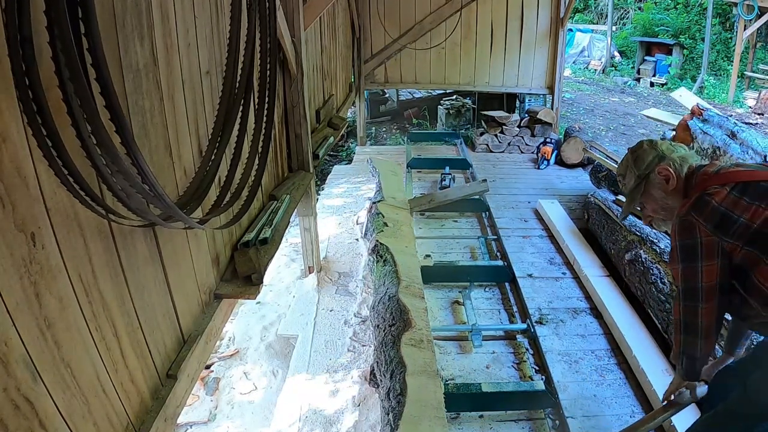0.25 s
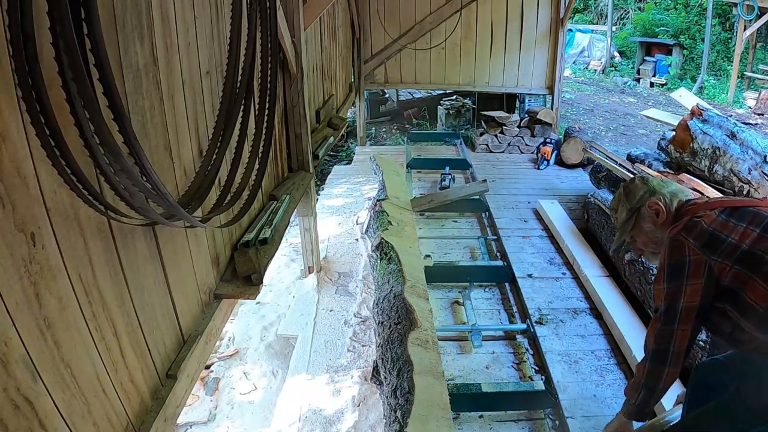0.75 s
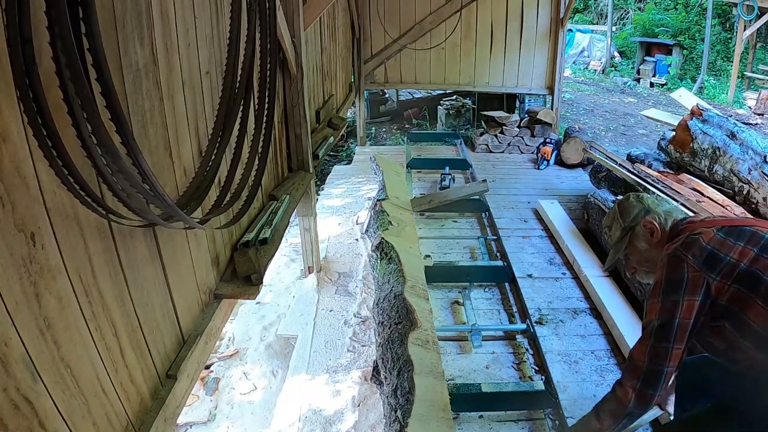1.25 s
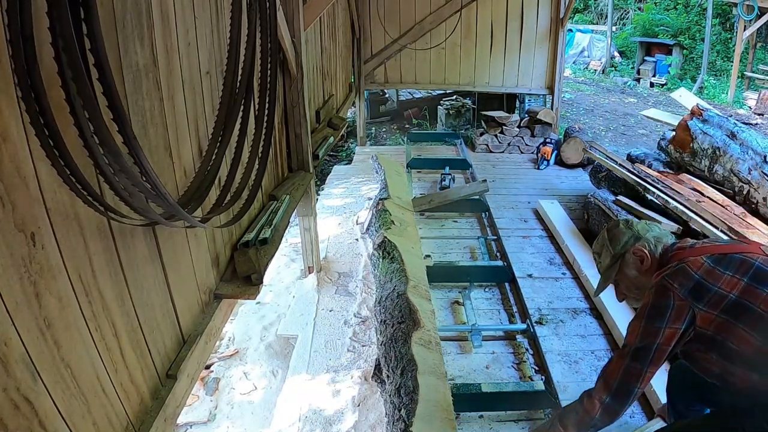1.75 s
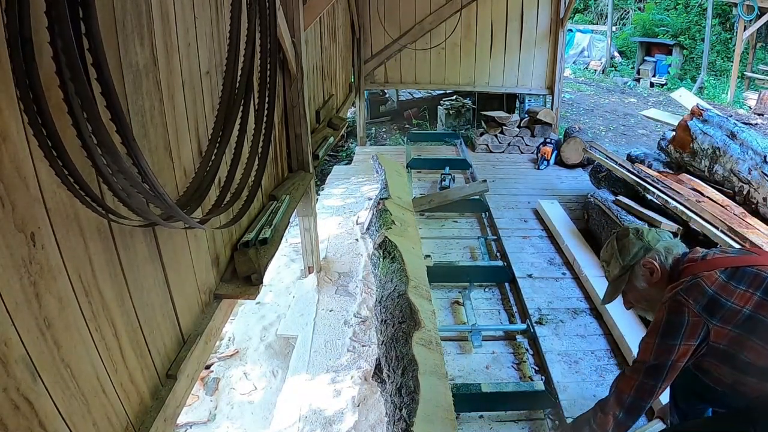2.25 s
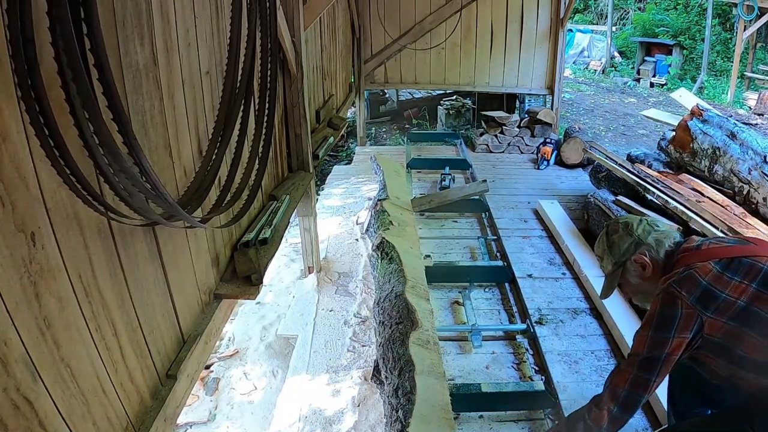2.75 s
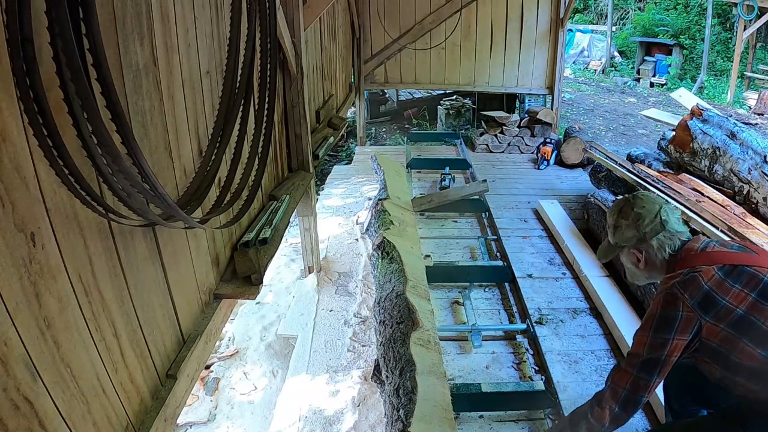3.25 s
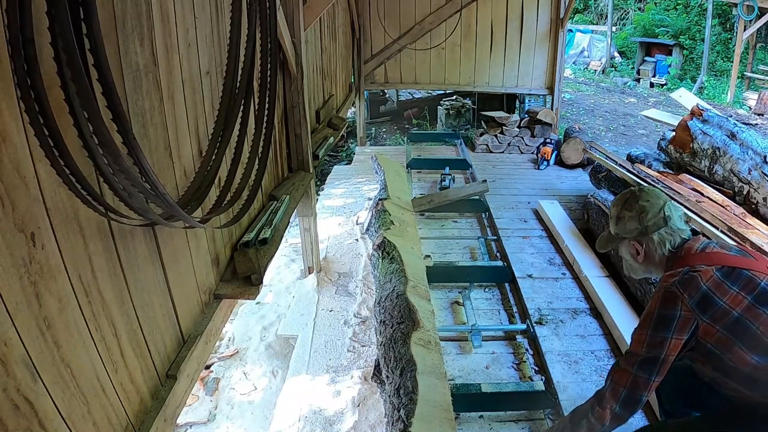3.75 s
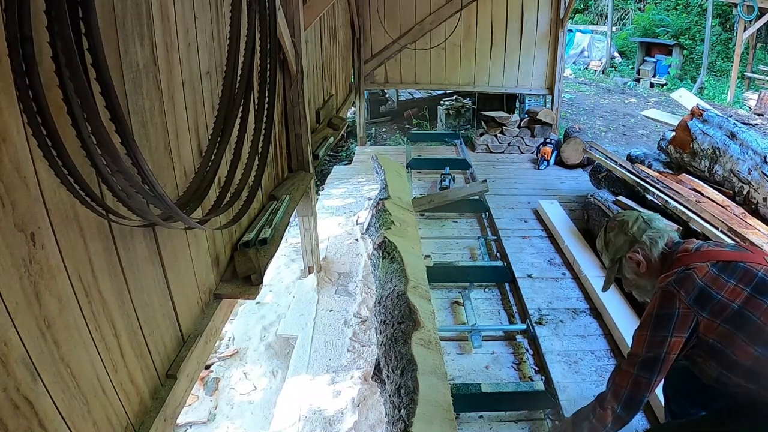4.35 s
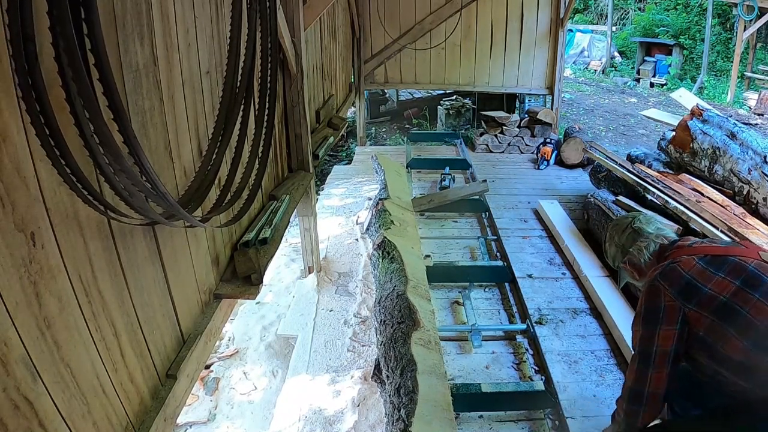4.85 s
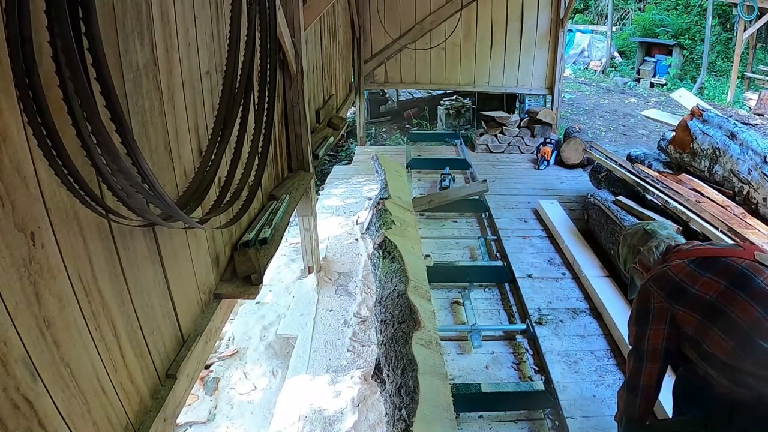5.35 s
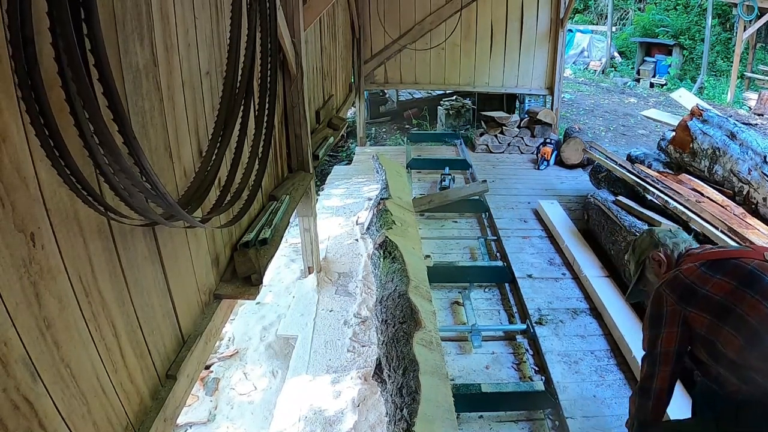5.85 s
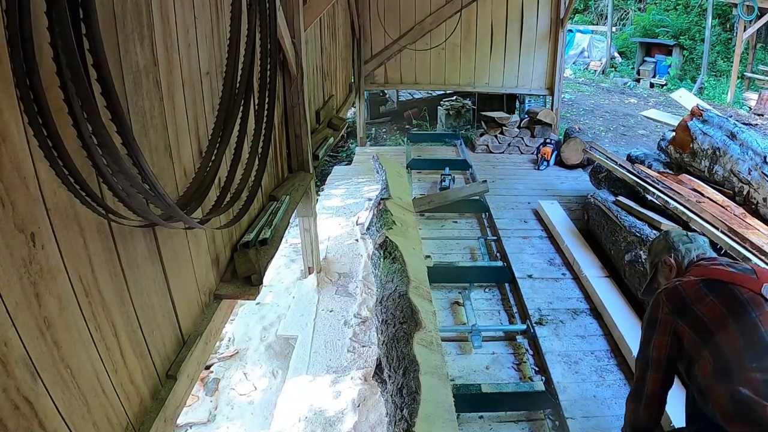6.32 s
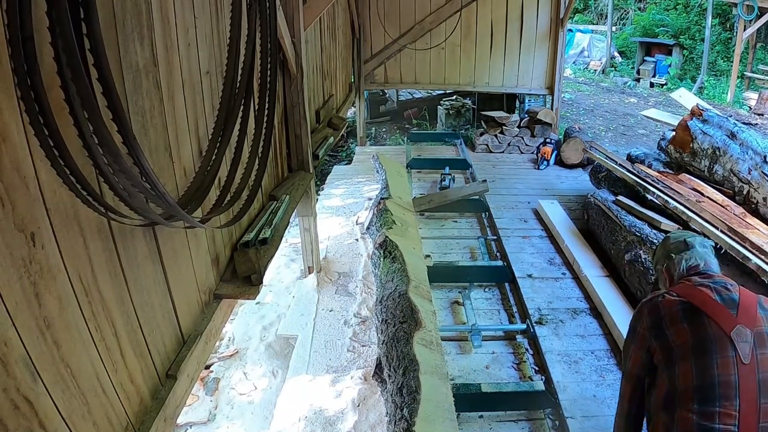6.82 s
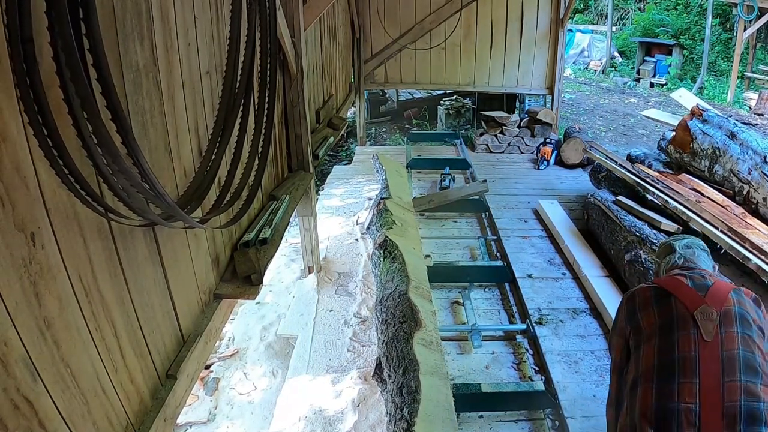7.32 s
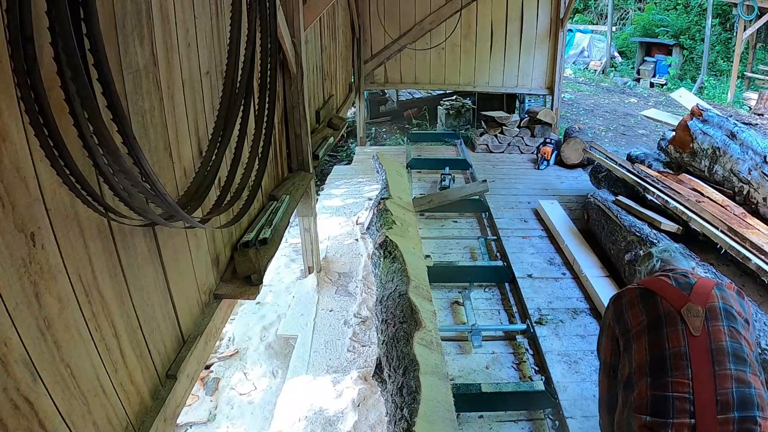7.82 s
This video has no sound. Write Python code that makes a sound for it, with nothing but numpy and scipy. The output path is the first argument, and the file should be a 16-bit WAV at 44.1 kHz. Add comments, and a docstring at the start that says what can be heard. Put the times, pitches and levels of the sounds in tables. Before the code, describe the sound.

A nearby stereo microphone in an open plank shed hears a heavy slab being worked on steel. Light taps and soft boot thuds begin; at 0.5 s a hard woody clunk with a scrape, at 1.0 s the loudest blow, steel ringing briefly and the floor booming low. A loose bar makes a tiny quick rattle at 1.65 s, then a medium knock at 2.0 s. Work quiets from 2 to 5.5 s, leaving a low vehicle hum and rumble with upper tones swelling around 2.5-3 s and fading, over smooth faint road wash, and soft thuds near 4.1 s. At 5.65-5.85 s come a knock, short scrape and deep thumps; crisp knocks at 6.24 and 6.36 s; faint rubbing and footfalls to 7 s. From 7.5 s hollow, lower knocks, a big floor thud and gritty stuttering drags continue to the end at 8 s.

```python
"""A wooden slab is levered with a bar, knocked and dragged on a steel sawmill bed in an open shed.
Blows and scrapes push the plank floor, slab and steel, which ring; boots thud as soft pushes.
A loose bar bounces on a rail: small clicks and slips ring its own tones.
Behind this a vehicle drones past on a road, as a low hum and upper tones that swell and fade,
over its rumble and a smooth noise wash of tyres and trees."""
import sys
import numpy as np
from scipy import signal
from scipy.fft import rfft, irfft
from scipy.io import wavfile
from scipy.ndimage import uniform_filter1d

SR = 44100
rng = np.random.default_rng(int(sys.argv[2]) if len(sys.argv) > 2 else 0)


def dump(signal):
    """Clip the signal to [-1, 1] and save it as 16-bit WAV at the path in sys.argv[1]."""
    limited = np.clip(np.atleast_2d(signal).T, -1, 1)
    pcm = np.round(limited * 32767).astype(np.int16)
    wavfile.write(sys.argv[1], SR, pcm)


N = 356328

# Hard blows. Each row: start in seconds, build-up of the contact in seconds, knock level in dB, then
# levels in dB against the knock: slab bending, slab knock tones, steel ringing, crack, snap, treble tick.
KNOCK_EVENTS = [(0.0924, 0.0037, -23, -5, -3, -3.5, -8.5, -11, -18),
                (0.245, 0.00047, -35, -5, -8, -6, -3, -7, 7.5),
                (0.445, 0.0047, -25.5, -6, 4.5, 5, -21, -16, -30),
                (0.5263, 0.0015, -8.5, 6, 1, -3, -5, -13, -35),
                (0.971, 0.0018, -25, 13.5, -9, 7, -9, -9, -33),
                (1.0204, 0.0014, -4.5, 2, -9, 0, -11, -20, -39.5),
                (1.029, 0.0011, -21.5, 7, -3, -11, 5, -14, -35),
                (1.9854, 0.0014, -20.5, -10, -7, -0.5, -12, -15, -20.5),
                (2.9944, 0.0019, -47, 0, -1, 1, 1, 3.5, -4.5),
                (4.589, .001, -46.5, 16, 11, -6, -5, -17, -28),
                (5.216, 0.00093, -53, 10, 16, -4, -2, 1, 3.5),
                (5.259, 0.00089, -55, -7, 10, -4, -3, -10, 0),
                (5.6405, .003, -31.5, -7, -1, 0, -12, -16, -31),
                (5.664, 0.0013, -17, -22, -2.5, -9, -13, -18, -17),
                (5.929, .0004, -38, 10, -14, -17, -1.5, -3.5, -1),
                (6.2388, 0.0019, -13.5, 0, -3.5, -6, -5.5, -10.5, -15),
                (6.3623, 0.00037, -14, 0, -2, -3.5, -7.5, -9.5, -16),
                (7.5176, 0.0036, -23.5, -15, 5.5, 4.5, -14, -18, -30),
                (7.5725, 0.0017, -20, -3, 9.5, 9, -10, -25, -27),
                (7.7336, 0.0021, -17.5, -7, 3, 2.5, -4.5, -13, -27),
                (7.8532, 0.0036, -24.5, 11, -15, -5, 2, -2, -14)]
# Boots and the slab's weight on the planks. Each row: start in seconds, floor level in dB,
# slab bending in dB against the floor.
THUD_EVENTS = [(0.031, -16, -5.5), (0.116, -16, -11), (0.241, -16.5, -2.5), (0.33, -13.5, -11),
               (0.45, -8, -21), (0.49, -7.5, -1), (0.517, -5, 2.5), (0.557, 3.5, -29), (0.599, -9, -8),
               (0.724, -9, -10.5), (0.917, -9.5, -12), (0.974, -7, -15), (1.021, -3, -14), (1.077, 2.5, -8),
               (1.193, -13, -7), (2.759, -15.5, -6), (3.42, -24, -5), (3.601, -27, 0), (3.955, -24, 2),
               (4.106, -10.5, 0.5), (4.128, -8.5, 0), (4.156, -8.5, -8.5), (4.2, -20, 1),
               (5.477, -9.5, -10.5), (5.529, -19.5, -1), (5.676, -1, -31), (5.724, 0.5, -23),
               (5.769, 3, -10.5), (5.835, 1, -34), (6.1, -6.5, -4), (6.126, -5, -13), (6.154, -38, 24),
               (6.233, -11.5, -9), (6.361, -9, -4.5), (6.416, -10.5, -0.5), (6.506, -14, -36),
               (6.781, -11, -26), (6.842, -20, -17), (6.99, -20, -24), (7.034, -30, -25), (7.569, 0, -13),
               (7.641, -3, -23), (7.694, -22.5, 9), (7.725, -5.5, -4), (7.795, -7, -28), (7.85, -10, -7.5),
               (7.968, -11.5, -21)]
# One list per drag. Each row: time in seconds, rub level in dB, then levels in dB against the rub:
# shaking of the slab, steel ringing, treble hiss.
DRAG_CURVES = [
    [(0.38, -53, 30, 0, -22), (0.428, -54.5, 18.5, 2, -14), (0.456, -28, 7, -3, -19.5),
     (0.486, -31.5, 15, 0, -17), (0.514, -25, 2, 3, -23), (0.536, -13.5, 4.5, -3, -20.5),
     (0.618, -39, 18, 5.5, -27), (0.754, -53, 18.5, -1, -18), (0.8, -51, 28, 5, -19)],
    [(0.82, -29, 24, 2, -15), (0.86, -49.5, 20.5, -23.5, -14.5), (0.948, -35, 10, 9, -18),
     (0.982, -18.5, 6, -5, -32), (1.008, -27, 23.5, -20, -29.5), (1.03, -17, -13, 12, -34),
     (1.058, -17.5, 1.5, -2, -41), (1.11, -33.5, 4.5, 2, -41), (1.206, -57.5, 26, 18.5, -52),
     (1.4, -67, 29, 1, -32)],
    [(5.6, -64, 28, 0, -8), (5.65, -49.5, 25, 3, -5), (5.696, -31.5, 3, 8, -14), (5.74, -20, 6, -19, -17),
     (5.77, -18.5, -1, -5, -15.5), (5.8, -26.5, 9, -7, -13.5), (5.825, -47, 3, -15, -4),
     (5.884, -77, 22, 0, -3), (5.92, -67, 21, -4, -4)],
    [(6.55, -53, -3, 2, -24), (6.608, -52, 14, -8, -8), (6.66, -44.5, 2, 2, -12), (6.77, -56, 7, 6, -2),
     (6.796, -54, -4, -15, -2.5), (6.85, -60, 0, 4, -1)],
    [(7.3, -52, 3, -2, -27), (7.444, -41, 9.5, 1, -19), (7.496, -38.5, 4, 9, -18),
     (7.538, -29.5, -9, -13, -15.5), (7.575, -28, 12, 13, -15), (7.605, -25, 3, 12, -18),
     (7.64, -24.5, 1, -3, -11), (7.665, -26, 10.5, -8, -18), (7.708, -29, 12.5, -3, -15),
     (7.746, -35.5, 21.5, -10, -11), (7.8, -26.5, -8, -8, -19), (7.84, -25, -0.5, -10, -13),
     (7.865, -23.5, -12, -7, -18), (7.89, -20.5, -18, -4, -13), (7.91, -18.5, -9, -20, -20.5),
     (7.93, -49.5, 10, 4, 9.5), (8.042, -40.5, -14, -5, -25), (8.08, -20, 3, 3, -1)],
]
# The bar bouncing on a rail. Each row: start in seconds, tap level in dB,
# level in dB of the slips that follow.
BAR_BOUNCES = [(1.627, -61, -61.5), (1.6444, -39, -63), (1.667, -54, -65.5), (1.681, -57, -68),
               (1.706, -48, -73)]

# Ringing tones of each body. Each row: pitch in Hz, level in dB against the body's other tones,
# time to die by 60 dB in seconds.
FLOOR_MODES = [(61.3, 26.5, 0.43), (65, 31.5, 0.22), (74, 15.5, 0.017), (100, -8.5, 0.04), (132, -1, 0.076)]
FIRST_FLOOR_MODES = [(68.2, 2.5, 0.31), (74.8, 0.5, 0.4), (89.1, 4.5, 0.31), (101.4, -4.5, 0.24),
                     (121, -21, 0.056)]  # higher, while the first end is levered
SLAB_MODES = [(150.7, -2.5, 0.06), (165, -9, 0.42), (208, -1.5, 0.28), (231.1, 5, 0.34), (241.45, -1, 0.37),
              (291, -8, 0.21)]
SLAB_KNOCK_MODES = [(384.5, -3.5, 0.25), (421, -4, 0.32), (450.5, -8.5, 0.35), (490.3, 3.5, 0.13),
                    (519.7, -1, 0.18), (590, -15, 0.13), (676, -15.5, 0.47)]
STEEL_MODES = [(840, -18.5, 0.081), (909, 0.5, 0.38), (944, 6.5, 0.25), (987, -3, 0.25), (1021, 11.5, 0.16),
               (1117, 4.5, 0.23), (1310, -13.5, 0.35), (1490, -4.5, 0.3), (1800, -17, 0.093),
               (1870, -1, 0.15), (2102, -5.5, 0.23), (2110, -17, 0.15), (2660, -16, 0.2),
               (2753, -2.5, 0.23)]
LEVER_MODES = [(4230, -1, .12), (4520, -2, 0.12), (5450, -5, .14)]  # the lever bar, while the first end is lifted
# Tones of the bouncing bar. Each row: pitch in Hz, width in Hz, level in dB against the other tones.
BAR_RESONANCES = [(257, 120, 9.5), (1115, 210, 8), (1327, 200, 12.5), (1510, 280, 0), (1830, 150, 0.5),
                  (2570, 85, -9), (4240, 90, -11), (4620, 310, -6)]
# Range of each body: floor, slab, slab tones, steel, knock, crack, snap, tick.
# Each row: low edge in Hz, high edge in Hz, dense unpitched part in dB against the ringing tones.
BODY_BANDS = [(40.3, 117.7, -3), (126, 290, -1), (310, 688, -2), (729, 1094, 0.5), (940, 2320, 0),
              (2447, 3510, 0), (3550, 5640, 8.5), (5200, 10200, 0)]
# The floor's range while the first end is levered. One row: low edge in Hz, high edge in Hz,
# dense part in dB against the ringing tones.
FIRST_FLOOR_BAND = (46, 143, -1.4)

# Tone colour of a blow's dense part. Each row: frequency in Hz, relative level in dB per Hz.
BLOW_COLOUR = [(30, -5.5), (80, -7.5), (240, -17.5), (600, -13.5), (1000, -16), (2000, -19.5),
               (4000, -34.5), (6300, -41.5), (8000, -45), (10000, -61.5), (15000, -46.5)]
# How fast sound dies in the shed. Each row: frequency in Hz, time to die by 60 dB in seconds.
SHED_DECAY = [(60, 0.66), (260, 0.24), (700, 0.28), (1840, 0.22), (4850, 0.21), (10000, 0.18)]
# Stereo likeness of nearby sounds. Each row: frequency in Hz, left-right likeness (1 is identical).
NEAR_LIKENESS = [(60, 0.99), (250, 0.995), (600, 0.95), (1300, 0.92), (2700, 0.85), (8000, 0.5)]
# Stereo balance of nearby sounds. Each row: frequency in Hz, left minus right in dB.
NEAR_BALANCE = [(60, .5), (300, 0), (1500, 2), (7000, 1)]

# A low hum near 60-76 Hz: the engine's drone, with the floor's ringing at the start and after 5.9 s.
# Each row: time in seconds, pitch in Hz, level in dB.
HUM_CURVE = [(0, 76, -26.5), (0.398, 72.95, -27), (1.299, 74.3, -33.5), (1.761, 72.2, -68),
             (1.901, 71.88, -31.5), (2.2, 71.14, -26), (2.45, 68.6, -32.5), (2.56, 71.4, -23),
             (2.861, 68.74, -20.5), (2.911, 69.38, -28), (2.999, 69.06, -18), (3.279, 69.04, -16),
             (3.521, 70.1, -24), (3.869, 69.6, -20.5), (4.088, 66.65, -25.5), (4.281, 67.43, -38),
             (5.401, 65, -52.5), (5.951, 64.33, -26), (6.3, 65, -38.5), (6.9, 62.5, -27.5),
             (7.098, 60.45, -75), (8.08, 65, -27)]
# Tones over the hum. Each row: multiple of the hum's pitch, level in dB against one another,
# moment it is loudest in seconds.
UPPER_LINES = [(1.52, 4, 2.6), (2.001, -0.5, 2.8), (2.503, -3, 2.7), (2.832, 1, 2.85), (3.5, -6.5, 3.23),
               (4.1, -7.5, 2.6), (4.66, -9.5, 2.7)]
# Faster-falling tones, perhaps tyre tread. Each row: multiple of their shared pitch,
# level in dB against one another.
WHINE_PARTIALS = [(.83, -18), (1.0, -0.5), (1.15, -4), (1.31, 0.5), (1.45, -6)]
# Colour of the distant wash. Each row: frequency in Hz, relative level in dB per Hz.
WASH_COLOUR = [(25, -10), (60, 1), (120, -15.5), (250, -19), (500, -24.5), (1000, -21), (1600, -26),
               (2500, -30.5), (4000, -36), (6300, -44), (8000, -52), (10000, -67), (13000, -78.5),
               (16000, -98)]
# Colour of the vehicle's rumble. Each row: frequency in Hz, relative level in dB per Hz.
RUMBLE_COLOUR = [(20, -5.5), (45, -9.5), (80, -3), (150, -7), (250, -11.5), (450, -16.5), (700, -19.5),
                 (1500, -23), (4000, -40.5), (16000, -120)]
# Stereo likeness of wash and rumble. Each row: frequency in Hz, left-right likeness (1 is identical).
ROAD_LIKENESS = [(60, 0.96), (130, 0.91), (280, 0.93), (590, 0.8), (1260, 0.75), (2700, 0.32)]

# Blows: length of a hard contact and of a boot's push; knock tones against slab bending in a thud.
RAGGED_S, TREAD_S, THUD_TONES_DB = 0.0027, 0.00064, -4.5
SLIP_S = 0.017  # how quickly the bar's slips die away
# Drags: levels against the rub, or against the shake for the floor, and how far they follow
# the table's shake, steel and hiss.
RUB_FLOOR_DB = -4.5
RUB_TONES_DB, TONES_PER_SHAKE, TONES_PER_STEEL = 1, 0.48, 0.28
RUB_RASP_DB, RASP_PER_HISS = 0.5, 0.38
RUB_FIZZ_DB, FIZZ_PER_HISS = 2.5, 0.67
STUTTER_DB, STUTTER_S = 3, .006  # the drag sticks and slips
FIRST_END_S = 2.0  # until then the first end is levered
OVERHANG_S = 7.2  # from then the slab hangs past its support and rubs a longer cross beam
OVERHANG_PITCH, FAR_BEAM_PITCH = .875, .875  # shares of the usual slab and steel pitch
SMOOTH_HZ = 120  # the dense tail has no colour of its own wider than this

CLOSEST_S = 2.49  # the vehicle is at its closest, and its rumble loudest
SWELL_S = 0.32  # this long from its loudest moment a plain swell has half the power
UPPER_DB, UPPER_STEEPNESS = -38, 1.02  # upper tones, and how steeply each fades around its loudest moment
WHINE_S, WHINE_DB, WHINE_FADE_DB_PER_S = 2.45, -46.5, 24.5  # loudest moment, level then, fade around it
WHINE_HZ, WHINE_SAG_HZ_PER_S = 339.4, 31  # pitch at the loudest moment and its steady fall
RUMBLE_DB, FAR_RUMBLE_DB, WASH_DB, WASH_SWELL_DB = -32.5, -42, -37, -45.5
ROAD_LEFT_DB = 0.3  # left minus right

BASS_CUT_HZ, EDGE_HZ = 43, 15700
# Gain control: the share of the excess above a level that is turned down; the held level sinks slowly.
DUCK_FROM_DB, DUCK_SHARE, HOLD_FALL_DB_PER_S = -31, 0.18, 8.5


def work():
    """Blows and drags push floor, slab, steel and air; each body then rings in its own way."""
    force = np.zeros((8, N))  # floor, slab, slab tones, steel, knock, crack, snap, tick
    knock_and_tread(force)
    for rows in DRAG_CURVES:
        drag(force, rows)
    floor, slab, tones, steel, knock, crack, snap, tick = force
    (floor_band, slab_band, tones_band, steel_band,
     knock_band, crack_band, snap_band, tick_band) = BODY_BANDS

    first = np.arange(N) < FIRST_END_S * SR
    last = np.arange(N) > OVERHANG_S * SR
    overhung = [(hz * OVERHANG_PITCH, db, t60) for hz, db, t60 in SLAB_MODES]
    far_beam = [(hz * FAR_BEAM_PITCH, db, t60) for hz, db, t60 in STEEL_MODES]
    bodies = [
        (floor * first, FIRST_FLOOR_MODES, FIRST_FLOOR_BAND),
        (floor * ~first, FLOOR_MODES, floor_band),
        (slab * ~last, SLAB_MODES, slab_band),
        (slab * last, overhung, slab_band),
        (tones, SLAB_KNOCK_MODES, tones_band),
        (steel * ~last, STEEL_MODES, steel_band),
        (steel * last, far_beam, steel_band),
        (knock, [], knock_band),
        (crack, [], crack_band),
        (snap * first, LEVER_MODES, snap_band),
        (snap * ~first, [], snap_band),
        (tick, [], tick_band),
    ]
    # Two random replies fade into each other and back every .13 s, which evens their colour.
    share = np.cos(np.pi * np.arange(N) / SR / .13) ** 2
    out = np.zeros((2, N))
    for push, modes, band in bodies:
        for part in (share, 1 - share):
            out += rung(push * part, answer(modes, *band))
    return out


def knock_and_tread(force):
    """A hard blow pushes all but the floor; a soft thud pushes the floor and the slab."""
    ring = np.sqrt(0.0065 * SR)  # a blow's level is spread over its first moments
    for s, rise, db, slab_db, tones_db, steel_db, *bright_db in KNOCK_EVENTS:
        bodies_db = [slab_db, tones_db, steel_db, 0, *bright_db]
        push = ring * gain_of(db) * contact(RAGGED_S, rise)
        add(force[1:], s, gain_of(bodies_db)[:, None] * push)
    for s, db, slab_db in THUD_EVENTS:
        bodies_db = [0, slab_db, slab_db + THUD_TONES_DB]
        push = ring * gain_of(db) * tread(TREAD_S)
        add(force[:3], s, gain_of(bodies_db)[:, None] * push)


def drag(force, rows):
    """Rubbing is a dense run of random tiny catches that pushes every body at once."""
    s, *columns = np.transpose(rows)
    t = np.arange(s[0], s[-1], 1 / SR)
    db, shake_db, steel_db, hiss_db = (np.interp(t, s, c) for c in columns)

    # Bark catches on the steel about 5000 times a second, some catches far stronger than others.
    grit = gain_of(2.7 * np.minimum(rng.exponential(1, len(t)), 5))
    grit *= rng.random(len(t)) < 5000 / SR
    stutter = evened(uniform_filter1d(rng.standard_normal(len(t)), round(STUTTER_S * SR)))
    grit *= gain_of(STUTTER_DB * stutter)
    grit = evened(grit * rng.standard_normal((8, len(t))))
    grit *= signal.windows.tukey(len(t), .15)  # soft start and end

    floor_db = shake_db + RUB_FLOOR_DB
    tones_db = RUB_TONES_DB + TONES_PER_SHAKE * shake_db + TONES_PER_STEEL * steel_db
    rasp_db = RUB_RASP_DB + RASP_PER_HISS * hiss_db
    fizz_db = RUB_FIZZ_DB + FIZZ_PER_HISS * hiss_db
    bodies_db = np.broadcast_arrays(floor_db, shake_db, tones_db, steel_db, 0, rasp_db, fizz_db, hiss_db)
    add(force, s[0], grit * gain_of(db) * gain_of(bodies_db))


def contact(length, rise):
    """A hard edge is a click and ragged milliseconds; a slower edge swells and clicks less. Energy 1."""
    t, rise = np.arange(1300) / SR, np.clip(rise, .0002, .01)
    ragged = rng.choice([-1., 1.], len(t)) * np.exp(-t / (length + rise)) * np.minimum(t / rise, 1)
    click = np.exp(-rise / .0015) * (t == 0)
    push = click + .5 * ragged / np.linalg.norm(ragged)
    for _ in range(4):  # level every frequency, keep it brief
        z = rfft(push)
        push = irfft(z / abs(z)) * (t < 4 * (length + rise))
    return push / np.linalg.norm(push)


def tread(length):
    """A soft weight presses down in one smooth push of area 1."""
    u = np.arange(1300) / SR / np.clip(length, .0003, .004)
    push = u * np.exp(-u)
    return push / np.sum(push)


def answer(modes, lo_hz, hi_hz, dense_db):
    """A body and the shed answer a click with a few tones in a dense dying tail."""
    t = np.arange(SR // 2) / SR
    dense = noise(lambda hz, s: -60 * s / read(SHED_DECAY, hz), NEAR_LIKENESS, len(t), size=256, even=True)
    z = rfft(dense * (1 + 2.53 * np.exp(-t / 0.0041)), SR)  # direct sound leads; one bin a hertz
    own_colour = np.sqrt(uniform_filter1d(abs(z) ** 2, size=SMOOTH_HZ) + 1e-20)
    z *= gain_of(read(BLOW_COLOUR, np.arange(SR // 2 + 1))) / own_colour
    dense = irfft(z)[:, :len(t)]
    band = signal.butter(3, [lo_hz, hi_hz], "band", fs=SR, output="sos")
    out = gain_of(dense_db) * evened(signal.sosfilt(band, dense))

    if modes:
        # Each tone has a slightly different phase left and right.
        skew = .09 * rng.standard_normal((len(modes), 1, 1)) * [[1], [-1]]
        rings = np.zeros((2, len(t)))
        for (hz, db, t60), phase in zip(modes, skew):
            rings += gain_of(db - 60 * t / t60) * np.sin(2 * np.pi * hz * t + phase)
        wide = signal.butter(1, [lo_hz, 2 * hi_hz], "band", fs=SR, output="sos")
        out = out + evened(signal.sosfilt(wide, rings))
    left_db = read(NEAR_BALANCE, np.sqrt(lo_hz * hi_hz))
    return out / np.linalg.norm(out[0]) * gain_of([[left_db / 2], [-left_db / 2]])


def rung(push, reply):
    """A body repeats its reply for every push, worked out over the stretch where it is pushed."""
    busy, out = np.flatnonzero(push), np.zeros((2, N))
    stretch = push[None, busy[0]:busy[-1] + 1]
    add(out, busy[0] / SR, signal.oaconvolve(stretch, reply, axes=1))
    return out


def bar():
    """Each bounce is a click and a burst of slips, which ring the loose bar."""
    t, push = np.arange(2600) / SR, np.zeros(9000)
    start = BAR_BOUNCES[0][0]
    for s, tap_db, slip_db in BAR_BOUNCES:
        slips = gain_of(slip_db) * rng.standard_normal(len(t)) * np.exp(-t / SLIP_S)
        add(push, s - start, gain_of(tap_db) * (t == 0) + slips)
    ring = np.zeros(len(push))
    for hz, width, db in BAR_RESONANCES:
        tone = resonate(resonate(push, hz, width), hz, width)
        ring += gain_of(db) * tone * SR / (2 * abs(width))  # narrow tones are lifted
    out = np.zeros(N)
    add(out, start, ring)
    return out * gain_of([[1.5], [-1.5]])


def engine():
    """A nearly pure low hum, fuzzier upper tones on multiples of its pitch, and a sagging whine."""
    t = np.arange(N) / SR
    s, *columns = np.transpose(HUM_CURVE)
    hz, hum_db = (np.interp(t, s, c) for c in columns)
    hum = gain_of(hum_db) * line(hz, 0.057)

    upper = np.zeros(N)
    for k, db, loudest in UPPER_LINES:
        upper += gain_of(db) * line(k * hz, 0.61) * swell(loudest) ** UPPER_STEEPNESS

    whine_hz = WHINE_HZ - WHINE_SAG_HZ_PER_S * (t - WHINE_S)
    whine = sum(gain_of(db) * line(k * whine_hz, 1.85, width=12.0) for k, db in WHINE_PARTIALS)
    whine_db = WHINE_DB - WHINE_FADE_DB_PER_S * abs(t - WHINE_S)
    return hum + gain_of(UPPER_DB) * upper + gain_of(whine_db) * whine


def line(hz, fuzz, width=3.5):
    """A tone on the curve hz plus narrow noise (width in Hz), so strength and phase waver by fuzz."""
    waver = evened(resonate(resonate(rng.standard_normal(N), hz, 3 * width), hz, width))
    return np.sqrt(2) * np.sin(2 * np.pi * np.cumsum(hz) / SR) + fuzz * waver


def swell(loudest):
    """A gain that swells to 1 at the given moment and falls away on both sides."""
    return 1 / np.sqrt(1 + ((np.arange(N) / SR - loudest) / SWELL_S) ** 2)


def road():
    """Coloured noise makes a smooth distant wash and a low rumble; both swell with the vehicle."""
    wash = noise(lambda hz, s: read(WASH_COLOUR, hz) + 0 * s, ROAD_LIKENESS, N, size=2048)
    rumble = noise(lambda hz, s: read(RUMBLE_COLOUR, hz) + 0 * s, ROAD_LIKENESS, N, size=2048)
    passing = swell(CLOSEST_S)
    wash_gain = np.hypot(gain_of(WASH_DB), gain_of(WASH_SWELL_DB) * passing)
    rumble_gain = np.hypot(gain_of(FAR_RUMBLE_DB), gain_of(RUMBLE_DB) * passing)
    return wash_gain * evened(wash) + rumble_gain * evened(rumble)


def noise(db_of, same, count, size, even=False):
    """Stereo noise from random short-time spectra, db_of(hz, s) high; even = only phases are random."""
    frames, hz = count * 4 // size + 5, np.fft.rfftfreq(size, 1 / SR)
    a, b, c, d = rng.standard_normal((frames, len(hz), 4)).T
    alike = np.clip(read(same, hz), -1, 1)[:, None]
    left, other = a + 1j * b, c + 1j * d
    z = np.array([left, alike * left + np.sqrt(1 - alike ** 2) * other])
    z = z / abs(z) ** even * gain_of(db_of(hz[:, None], np.arange(frames) * size / 4 / SR))
    return signal.istft(z, nperseg=size, noverlap=size * 3 // 4)[1][:, :count]


def resonate(x, hz, width):
    """Shifts the curve hz down to zero, smooths, and shifts back: a resonance of gain 1."""
    turn = np.exp(2j * np.pi * np.cumsum(hz * np.ones(len(x))) / SR)
    r = np.exp(-np.pi * abs(width) / SR)
    return 2 * (turn * signal.lfilter([1 - r], [1, -r], x / turn + 1e-18)).real


def gain_of(db):
    """Turns decibels into a plain factor."""
    return 10 ** (np.asarray(db) / 20)


def evened(x):
    """Scales a sound to an average (RMS) strength of 1."""
    return x / np.sqrt(np.mean(x ** 2) + 1e-20)


def read(points, hz):
    """Reads a table between its rows, with frequency on a logarithmic scale."""
    f, value = np.transpose(points)
    return np.interp(np.log(hz + 1), np.log(f + 1), value)


def add(mix, s, sound):
    """Adds a sound into the mix from s seconds on, cut off at the mix's end."""
    part = mix[..., round(s * SR):][..., :sound.shape[-1]]
    part += sound[..., :part.shape[-1]]


def scene():
    """The work and the bar in front, the vehicle and road behind."""
    road_side = gain_of([[ROAD_LEFT_DB / 2], [-ROAD_LEFT_DB / 2]])
    return work() + bar() + (engine() + road()) * road_side


def record(dry):
    """Thins the lowest bass, turns down after loud blows, delays left by a sample, clips, cuts treble."""
    bass_cut = signal.butter(2, BASS_CUT_HZ, "high", fs=SR, output="sos")
    thin = signal.sosfilt(bass_cut, dry)
    power = uniform_filter1d((thin ** 2).mean(0), size=2000, origin=999)  # over the latest 2000 samples
    power_db = 10 * np.log10(abs(power) + 1e-12)
    # Peaks are held, then sink steadily.
    slope = np.arange(N) * HOLD_FALL_DB_PER_S / SR
    held_db = np.maximum.accumulate(power_db + slope) - slope
    over_db = np.maximum(held_db - DUCK_FROM_DB, 0)
    thin = thin / gain_of(DUCK_SHARE * over_db)
    channels = np.array([np.append(0, thin[0, :-1]), thin[1]])
    treble_cut = signal.firwin(511, EDGE_HZ, window=("kaiser", 9), fs=SR)
    return signal.oaconvolve(np.clip(channels, -1, 1), treble_cut[None], "same")


dry = scene()
out = record(dry)
dump(out)
```